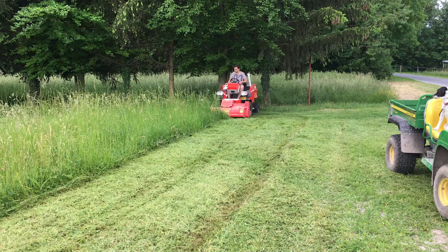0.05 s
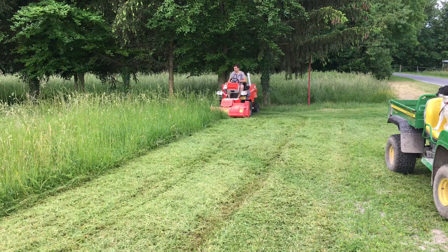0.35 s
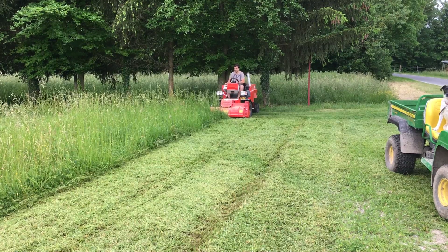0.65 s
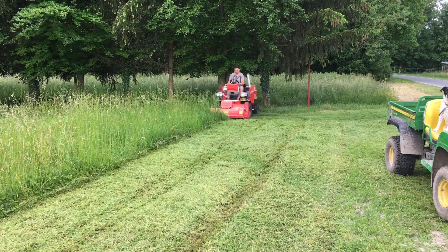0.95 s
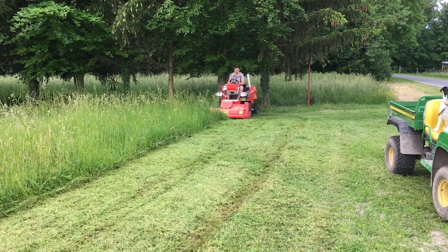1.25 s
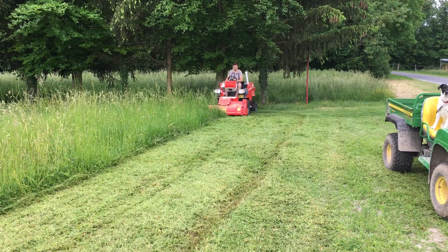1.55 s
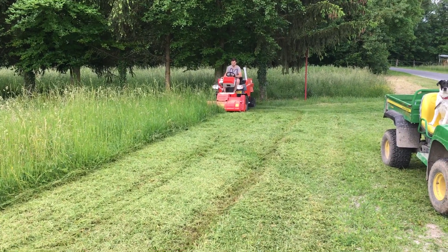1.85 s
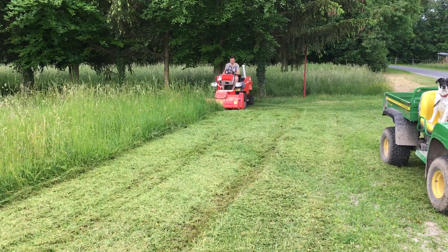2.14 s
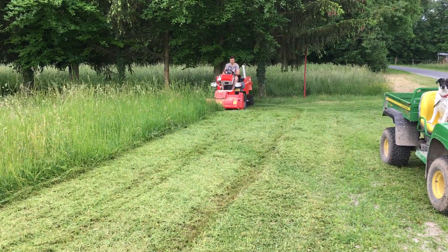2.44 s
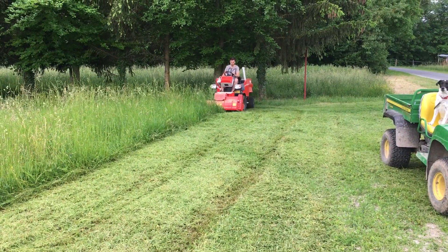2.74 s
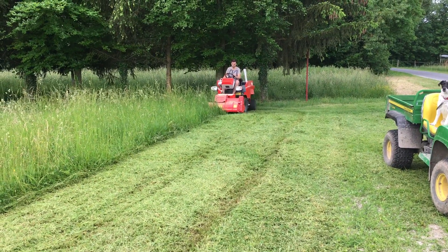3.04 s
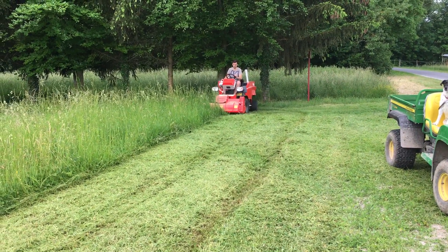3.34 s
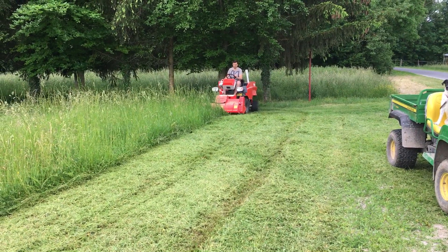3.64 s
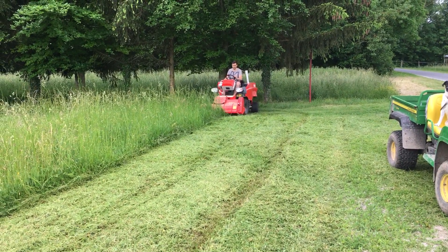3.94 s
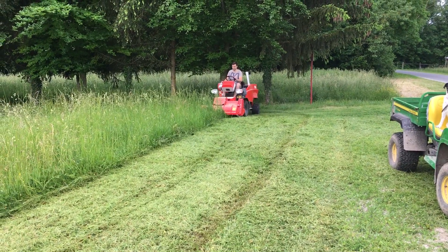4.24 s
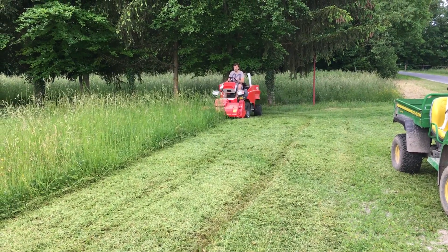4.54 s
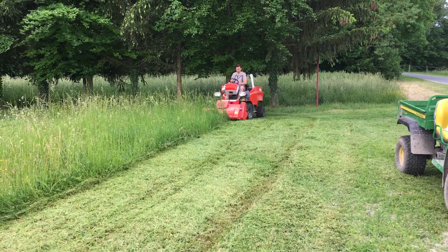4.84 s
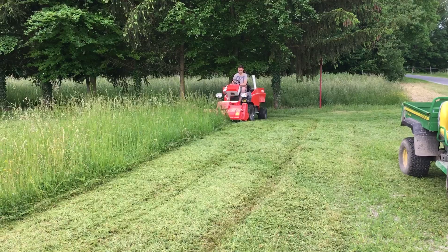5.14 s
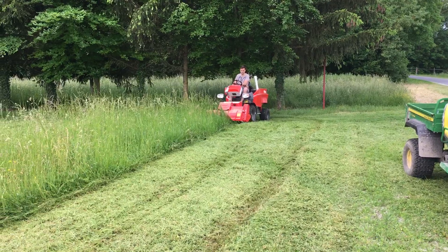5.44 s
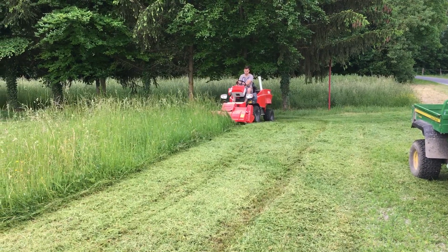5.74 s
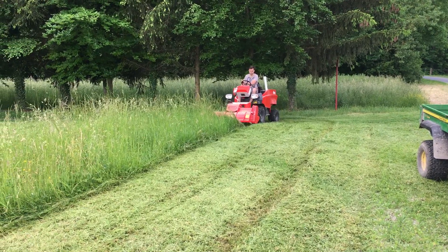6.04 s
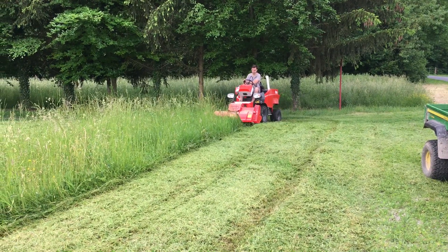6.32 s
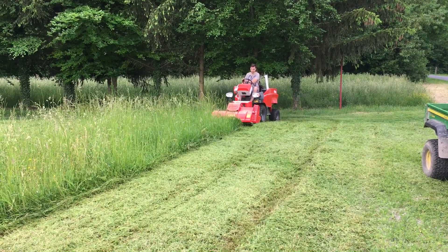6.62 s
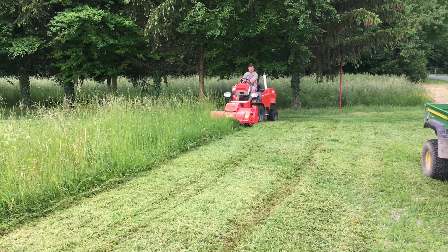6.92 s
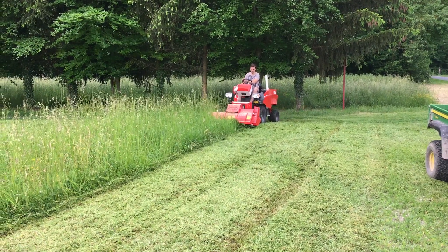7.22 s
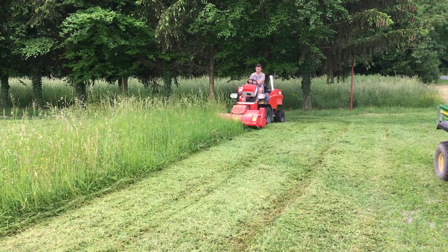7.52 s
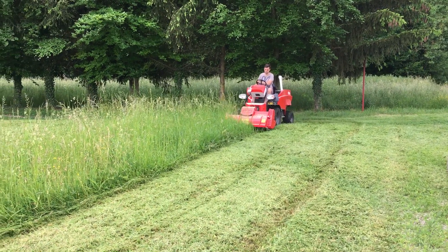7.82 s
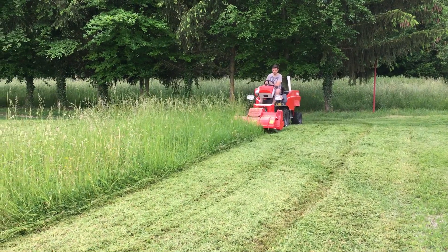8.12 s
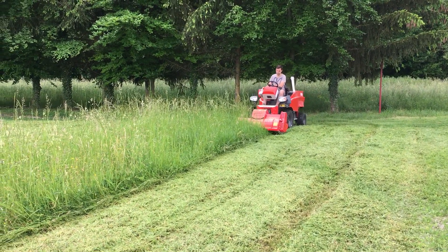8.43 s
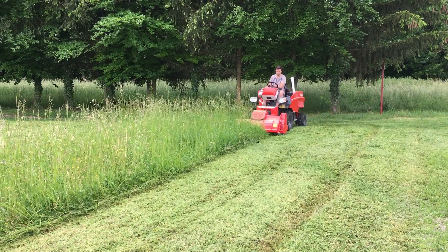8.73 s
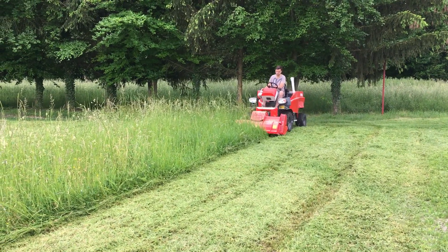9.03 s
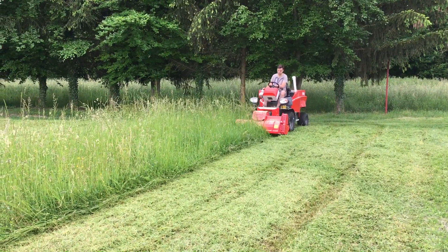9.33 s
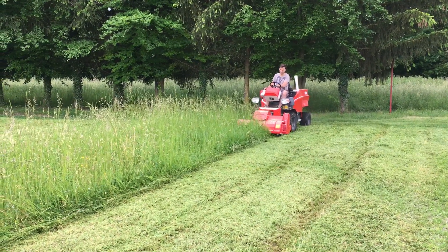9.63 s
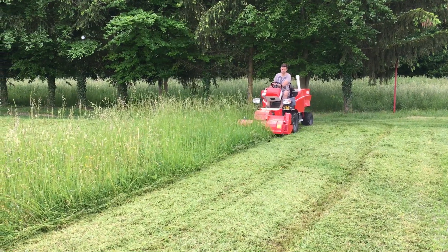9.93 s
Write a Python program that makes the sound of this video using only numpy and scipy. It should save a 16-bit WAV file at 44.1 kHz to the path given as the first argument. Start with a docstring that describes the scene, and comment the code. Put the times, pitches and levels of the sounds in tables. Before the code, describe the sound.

Outdoors, a ride-on mower revs up and settles into a steady drone with ticking valves and a roar of churned air. A faint thin whine and a distant bird are heard at the start. The blades bite into tall grass, and a crackling hiss builds as the mower slowly approaches the microphone. Dry stems snap now and then, and loose metal jingles and knocks on the cutting deck.

```python
"""Outdoors in tall grass, a ride-on flail mower revs up and drives slowly closer.
Exhaust and rotor drone at multiples of the shaft speed, valves clatter, and churned air roars.
The flails shred stalks in a crackling hiss that pulses with the drone; dry stems crack above it.
Loose steel jingles and knocks on the deck. At first a thin whine and a far bird are heard."""
import sys
import numpy as np
from scipy import signal
from scipy.fft import rfft, irfft, next_fast_len
from scipy.io import wavfile
from scipy.ndimage import map_coordinates

SR = 44100
rng = np.random.default_rng(int(sys.argv[2]) if len(sys.argv) > 2 else 0)


def generate_wav(signal):
    """Clip the signal to [-1, 1] and save it as 16-bit WAV at the path in sys.argv[1]."""
    frames = np.transpose(np.atleast_2d(signal))
    scaled = np.clip(frames, -1, 1) * 32767
    pcm = np.round(scaled).astype(np.int16)
    wavfile.write(sys.argv[1], SR, pcm)


N = 439677
TIME = np.arange(N) / SR


def from_db(db):
    """Decibels to gain."""
    return 10 ** (np.asarray(db) / 20)


def unit_rms(x):
    """Scale to rms 1."""
    return x / np.sqrt(np.mean(x ** 2) + 1e-20)


def curve(rows):
    """Interpolate (time_s, value) rows per sample."""
    return np.interp(TIME, *np.transpose(rows))


def bell(x, centre, half_width):
    """Gaussian hump, height 1."""
    return np.exp(-((x - centre) / half_width) ** 2)


def drift(rate_hz):
    """Slow random wander, rms 1."""
    step, warmup = 40, 2000
    pole = np.exp(-2 * np.pi * rate_hz * step / SR)
    noise = rng.standard_normal(N // step + warmup + 2)
    slow = signal.lfilter([1], [1, -2 * pole, pole * pole], noise)[warmup:]
    return np.interp(np.arange(N) / step, np.arange(len(slow)), unit_rms(slow))


def coloured(x, spectrum):
    """Shape x by a spectrum with 12 dB/octave skirts; rms 1."""
    hz, db = np.transpose(spectrum)
    size = next_fast_len(N)
    bin_hz = np.maximum(np.arange(size // 2 + 1) * SR / size, 1)
    gain = from_db(np.interp(np.log(bin_hz), np.log(hz), db))
    skirts = np.minimum(bin_hz / hz[0], 1) ** 2 * np.minimum(hz[-1] / bin_hz, 1) ** 2
    return unit_rms(irfft(rfft(x, size) * gain * skirts, size)[:N])


def grains(per_s, spread_db):
    """Random clicks, most small, a few large; rms 1."""
    sizes = from_db(spread_db * np.minimum(rng.exponential(1, N), 6))
    return unit_rms(sizes * rng.choice([-1, 1], N) * (rng.random(N) < per_s / SR))


def ring(clicks, hz, t60_s):
    """One mode: a unit click starts a decaying sine of height 1."""
    pole, angle = np.exp(-np.log(1000) / (t60_s * SR)), 2 * np.pi * hz / SR
    return signal.lfilter([0, np.sin(angle)], [1, -2 * pole * np.cos(angle), pole * pole], clicks + 1e-18)


def approach_db(start_m=19.2, speed_m_per_s=0.67):
    """Inverse-distance gain of a head-on approach."""
    return 20 * np.log10(start_m / (start_m - speed_m_per_s * TIME))


def load_db(free_db, bite_s=1.135, rise_s=0.017):
    """Rotor load: free_db running free, 0 dB once in the grass."""
    return np.interp(TIME, [bite_s, bite_s + rise_s], [free_db, 0])


def rasp_db(centre_s=1.152, half_width_s=0.0084, boost_db=6):
    """Brief burst as the flails first meet the grass."""
    return boost_db * bell(TIME, centre_s, half_width_s)


def partial(cycles, level_db, rough):
    """One drone line; uneven firings shake its amplitude and phase."""
    angle = 2 * np.pi * cycles
    in_phase = (1 + rough * drift(19.5)) * np.cos(angle)
    quadrature = rough * drift(22) * np.sin(angle)
    return from_db(level_db) * np.sqrt(2) * (in_phase + quadrature)


# Engine speed: time_s, shaft_hz
SHAFT_SPEED = [(0.09, 51.68), (0.26, 54.81), (0.55, 57.86), (0.95, 59.35), (1.5, 59.55), (2.1, 58.49),
               (3.0, 57.34), (3.85, 56.66), (4.5, 56.85), (5.5, 56.02), (6.4, 55.59), (7.2, 55.92),
               (7.8, 56.6), (8.15, 56.33), (8.85, 56.93), (9.6, 56.43), (9.95, 55.89)]
# Hum at 2x shaft speed: time_s, relative_db
HUM_LEVEL = [(0.15, -45.3), (0.48, -32), (0.72, -45), (2.6, -46.5), (3.08, -39), (3.4, -45), (4.6, -48.5),
             (5.1, -41.5), (5.5, -40.5), (5.85, -44), (6.15, -34), (7.1, -31), (8.85, -39.1), (9.7, -36.4)]
# Main tone at 4x shaft speed: time_s, relative_db
MAIN_TONE_LEVEL = [(0.1, -30.5), (0.65, -32.5), (6.96, -32.5), (7.4, -35.5), (7.78, -31.5), (8.88, -33.5),
                   (9.23, -30), (9.95, -31.5)]
# Weak partials: shaft_multiple, loaded_level_db
WEAK_PARTIALS = [(2.5, -55), (3, -51), (5, -56.5), (5.5, -61.5), (6, -52), (12, -53.5)]


def drone(turns, exhaust_hz=59.5, working_hz=56.2, buzz_db_per_hz=1.1):
    """Shaft-locked exhaust and rotor tones; the lowest throbs near an exhaust resonance."""
    shaft_hz = curve(SHAFT_SPEED)
    throb_db = -50.5 + 10.5 * bell(shaft_hz, exhaust_hz, half_width=1.63)
    buzz_db = -47.5 + buzz_db_per_hz * (shaft_hz - working_hz)
    out = partial(turns, throb_db, rough=0.12)
    out += partial(2 * turns + rng.random(), curve(HUM_LEVEL) - 0.3, rough=0.024)
    out += partial(4 * turns, curve(MAIN_TONE_LEVEL) - 0.1, rough=0.032)
    out += partial(8 * turns + rng.random(), buzz_db, rough=0.092)
    for multiple, level_db in WEAK_PARTIALS:
        out += partial(multiple * turns + rng.random(), level_db + load_db(free_db=-4), rough=0.53)
    return out


# Exhaust noise: freq_hz, relative_db
RUMBLE_SPECTRUM = [(25, -41), (45, -12), (75, -12.5), (110, -4), (165, -4.5), (205, -2.5), (270, -5.5),
                   (350, -8.5), (410, -13.5), (520, -26)]


def exhaust_rumble(start_db=-42.5):
    """Low exhaust noise, louder as the mower nears."""
    return from_db(start_db + approach_db()) * coloured(rng.standard_normal(N), RUMBLE_SPECTRUM)


# Churned air: freq_hz, relative_db
ROAR_SPECTRUM = [(300, -17), (480, 0), (680, 2.5), (1000, -3.5), (1450, -2.5), (1750, -6.5), (2400, -5),
                 (4000, -24)]


def rotor_roar(shaft_beat, base_db=-41):
    """The rotor churns air; under load the hollow of the deck booms."""
    air = rng.standard_normal((2, N)) * from_db(drift(48) + 0.2 * shaft_beat)
    cavity = unit_rms(np.gradient(ring(air[1], hz=775, t60_s=0.0091)))
    boom = from_db(-6 + load_db(free_db=-8)) * cavity
    gain_db = base_db + load_db(free_db=-2) + rasp_db() + 0.58 * approach_db()
    return from_db(gain_db) * (coloured(air[0], ROAR_SPECTRUM) + boom)


# Valve ticks: freq_hz, relative_db
CLATTER_SPECTRUM = [(1200, -26), (1900, -14), (2300, -5.5), (2650, -1.5), (3300, -2), (3550, -3.5),
                    (3850, -9.5), (5000, -13), (9000, -18)]
# Single grass tufts: centre_s, boost_db, half_width_s
TUFT_SURGES = [(0.313, 4.5, 0.07), (0.73, 5.5, 0.079), (1.34, 6.5, 0.06)]


def valve_clatter(shaft_beat, base_db=-41.5):
    """Ticks swell once a turn and grow with the load of grass, thick stems and tufts."""
    ticks = grains(per_s=8000, spread_db=1.55) * from_db(0.67 * shaft_beat + 1.35 * drift(14))
    grass_db, thick_db = curve(HISS_LEVEL), curve(CRUNCH_LEVEL)
    work_db = 0.57 * (grass_db - grass_db.mean()) + 0.13 * (thick_db - thick_db.mean())
    surge_db = sum(db * bell(TIME, centre_s, half_s) for centre_s, db, half_s in TUFT_SURGES)
    return from_db(base_db + work_db + surge_db + rasp_db()) * coloured(ticks, CLATTER_SPECTRUM)


# Amount of grass being cut: time_s, relative_db
HISS_LEVEL = [(0.1, -42.5), (1.2, -46.5), (1.9, -39.5), (2.8, -36.8), (3.0, -34.5), (3.45, -35.5),
              (3.8, -31.5), (4.1, -34.5), (4.5, -34), (4.95, -31), (5.4, -31), (5.9, -30), (6.9, -29.4),
              (7.15, -31), (8.0, -28.5), (8.7, -29.5), (9.6, -27), (9.95, -28.5)]
# Shredded stalks: freq_hz, relative_db
HISS_SPECTRUM = [(2300, -32), (3500, -21), (4200, -4), (5400, -0.6), (7000, -.5), (9000, 0.5), (11200, 2),
                 (13200, 3), (15800, 1)]
# Share of thick stems: time_s, level_re_hiss_db
CRUNCH_LEVEL = [(1.5, -7), (3.5, -16), (5.2, -11.5), (7.1, -4), (9.9, -12.5)]
# Thick stems breaking: freq_hz, relative_db
CRUNCH_SPECTRUM = [(1000, -26), (2500, 2.5), (4300, 8.5), (15000, 3.5)]


def grass_cutting(turns, shaft_beat):
    """Stalks snap in four bursts a turn over a spray of clippings; thick stems crunch."""
    bursts = from_db(2.3 * np.cos(2 * np.pi * 4 * turns) + 0.27 * shaft_beat + 0.78 * drift(40))
    snaps = sum(unit_rms(ring(grains(per_s=750, spread_db=3), hz, t60_s=0.00046))
                for hz in np.geomspace(9300, 15000, num=5))
    spray = rng.standard_normal(N)
    hiss = coloured(bursts * (unit_rms(snaps) + spray), HISS_SPECTRUM)
    crunch = coloured(bursts * grains(per_s=8000, spread_db=1.5), CRUNCH_SPECTRUM)
    direct = hiss + from_db(curve(CRUNCH_LEVEL)) * crunch
    return from_db(curve(HISS_LEVEL) + 2) * (direct + ground_bounce(direct))


def ground_bounce(direct, gain_db=-13.5):
    """Weak ground reflection; its lag grows as the mower nears."""
    lag_s = np.linspace(0.0018, 0.0027, N)
    return from_db(gain_db) * map_coordinates(direct, [(TIME - lag_s) * SR], order=3)


# Treble notches: centre_hz, half_width_hz, gain_db
NOTCHES = [(3780, 125, -2.5), (4500, 190, -5.5), (4970, 170, -3), (6200, 260, -4), (7870, 330, -4),
           (10250, 310, -6), (12600, 170, -3), (14500, 400, -0.5)]


def reflection_notches(x):
    """Short reflections cancel narrow treble bands."""
    size = next_fast_len(N)
    bin_hz = np.arange(size // 2 + 1) * SR / size
    dips_db = sum(db * bell(bin_hz, hz, half_hz) for hz, half_hz, db in NOTCHES)
    return irfft(rfft(x, size) * from_db(dips_db), size)[:N]


def whine(pitch_hz=9658, start_db=-49, decay_s=0.45):
    """Thin, unsteady whine that dies away."""
    tone = unit_rms(ring(rng.standard_normal(N), pitch_hz, t60_s=0.054))
    return from_db(start_db) * np.exp(-TIME / decay_s) * tone


# Steel deck resonances: pitch_hz, relative_db, t60_s
DECK_MODES = [(1756, -6, 0.056), (1990, -6, 0.019), (2090, 6, 0.05), (2097, 6.5, .05), (2580, -8, 0.029),
              (2800, -13, .02)]


def deck_jingle(base_db=-55, shake_db=8, shake_half_width_s=0.14):
    """Loose steel touches the deck lightly, harder around each knock."""
    touches = grains(per_s=350, spread_db=1.5)
    jingle = sum(from_db(db) * ring(touches * rng.standard_normal(N), hz, t60_s)
                 for hz, db, t60_s in DECK_MODES)
    shaken = np.max([bell(TIME, start_s, shake_half_width_s) for start_s, _ in DECK_KNOCKS], axis=0)
    level_db = base_db + 1.34 * approach_db() + shake_db * shaken + 1.1 * drift(5.4)
    return from_db(level_db) * unit_rms(jingle)


# Bird calls: start_s, level_db
CALLS = [(0.32, -48), (0.777, -52)]
# Slurs of one call: delay_s, start_hz, end_hz, offset_db
SLURS = [(0, 4760, 4500, -1), (0.075, 3850, 3500, 3)]


def bird(slur_s=0.064):
    """A far bird calls twice, two falling slurs each time."""
    out = np.zeros(N)
    for start_s, level_db in CALLS:
        for delay_s, start_hz, end_hz, offset_db in SLURS:
            progress = np.clip((TIME - start_s - delay_s) / slur_s, 0, 1)
            pitch_hz = end_hz + (start_hz - end_hz) * (1 - progress) ** 1.7
            envelope = from_db(level_db + offset_db) * np.sin(np.pi * progress)
            out += envelope * np.sin(2 * np.pi * np.cumsum(pitch_hz) / SR)
    return out


# Dry stems breaking: start_s, peak_db, pitch_hz
DRY_STEMS = [(2.639, -9.5, 10500), (2.950, -16, 13000), (4.114, -8, 10500), (5.632, -11, 11500),
             (5.677, -7, 10000), (6.956, -5, 13500)]


def stem_cracks(splinter_decay_s=0.0004):
    """A dry stem breaks with one sharp snap and a few splinters."""
    out, age_s = np.zeros(N), TIME[:SR // 100]
    for start_s, peak_db, pitch_hz in DRY_STEMS:
        highpass = signal.butter(4, 0.7 * pitch_hz, "high", fs=SR, output="sos")
        snap = age_s == 0
        splinters = 0.2 * rng.standard_normal(len(age_s)) * np.exp(-age_s / splinter_decay_s)
        crack = signal.sosfilt(highpass, ring(snap + splinters, pitch_hz, t60_s=0.0004))
        at = round(start_s * SR)
        out[at:at + len(age_s)] += from_db(peak_db) * crack / np.abs(crack).max()
    return out


# Hard blows of loose steel: start_s, relative_db
DECK_KNOCKS = [(3.0184, -29), (4.0512, -27), (4.6523, -27), (4.7037, -23), (5.9165, -18), (5.9698, -26),
               (6.3629, -21), (6.4163, -26), (7.635, -24), (7.6869, -22), (8.1718, -32), (8.2906, -18),
               (8.7291, -25), (8.9441, -23), (9.3985, -28)]


def deck_knocks(scuff_decay_s=0.014, clack_gain_db=25, ring_gain_db=-7):
    """Loose steel strikes and scuffs the deck: a broad clack plus ringing modes."""
    blows, age_s = np.zeros(N), TIME[:SR // 10]
    for start_s, relative_db in DECK_KNOCKS:
        contact = rng.standard_normal(len(age_s)) * np.exp(-age_s / scuff_decay_s)
        at = round(start_s * SR)
        blows[at:at + len(age_s)] += from_db(relative_db) * contact / np.linalg.norm(contact)
    clack = signal.sosfilt(signal.butter(3, [1600, 3100], "band", fs=SR, output="sos"), blows)
    ringing = sum((-1) ** k * from_db(db) * ring(blows, hz, t60_s)
                  for k, (hz, db, t60_s) in enumerate(DECK_MODES))
    return from_db(clack_gain_db) * clack + from_db(ring_gain_db) * ringing


def scene():
    """Mower and bird, mono; one shaft angle drives drone, roar, clatter and cutting."""
    turns = np.cumsum(curve(SHAFT_SPEED) * (1 + 0.00087 * drift(4.9))) / SR
    shaft_beat = np.cos(2 * np.pi * turns)
    machine = exhaust_rumble() + rotor_roar(shaft_beat) + valve_clatter(shaft_beat)
    noise = reflection_notches(machine + grass_cutting(turns, shaft_beat))
    mower = noise + drone(turns) + stem_cracks() + deck_knocks() + deck_jingle() + whine()
    return (mower + bird())[None]


def record(dry):
    """Brief silence, fast fade-in, steep low-pass."""
    start_s, fade_s, cutoff_hz = 0.084, 0.002, 15800
    fade_in = np.clip((TIME - start_s) / fade_s, 0, 1)
    lowpass = signal.ellip(12, 0.1, 80, cutoff_hz, fs=SR, output="sos")
    return signal.sosfilt(lowpass, dry * fade_in)


dry = scene()
out = record(dry)
generate_wav(out)
```